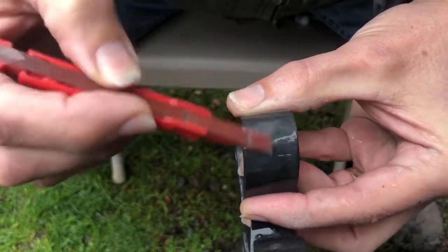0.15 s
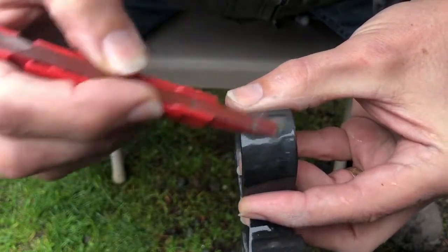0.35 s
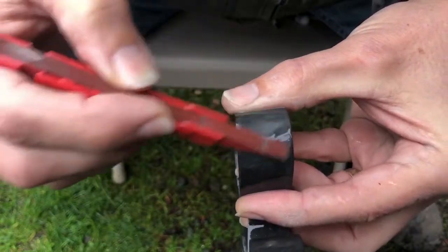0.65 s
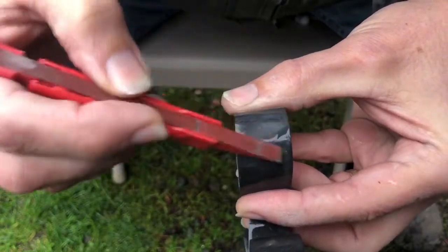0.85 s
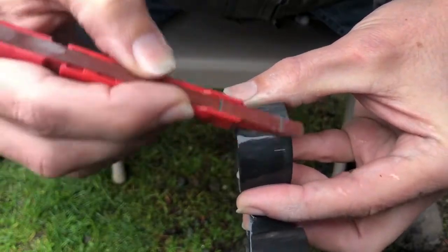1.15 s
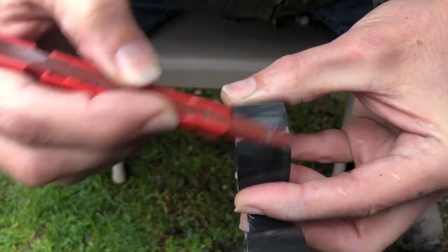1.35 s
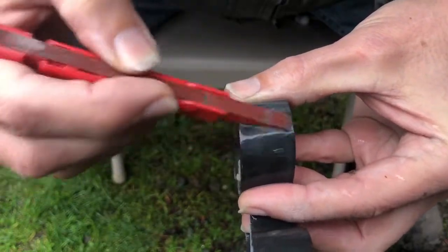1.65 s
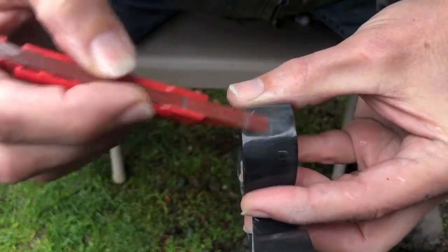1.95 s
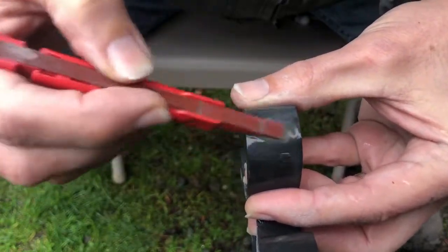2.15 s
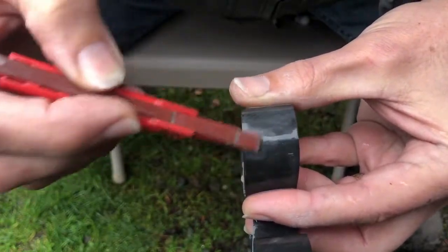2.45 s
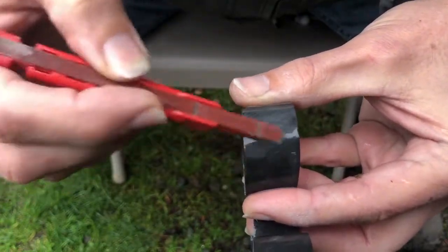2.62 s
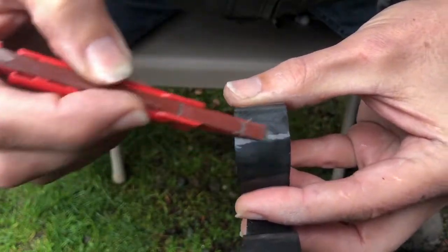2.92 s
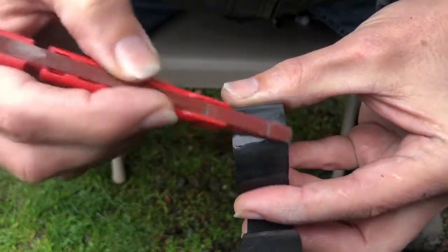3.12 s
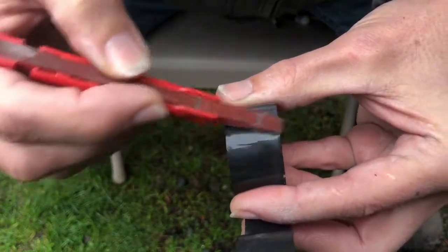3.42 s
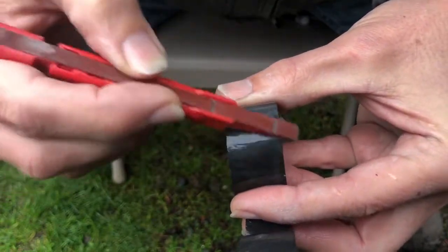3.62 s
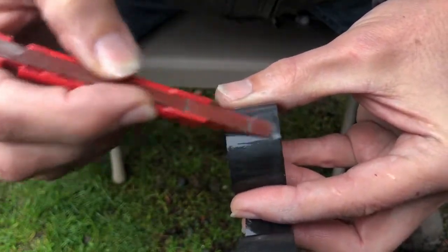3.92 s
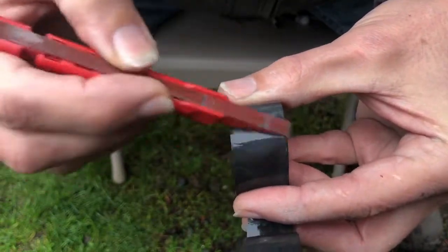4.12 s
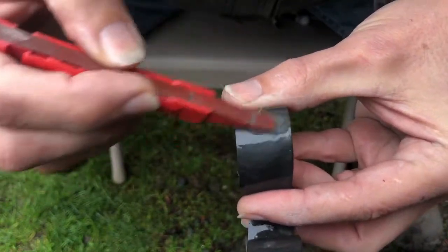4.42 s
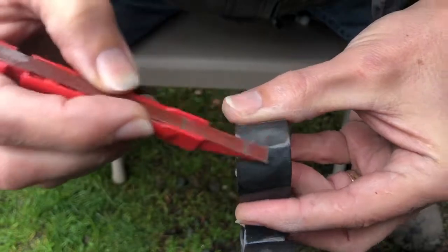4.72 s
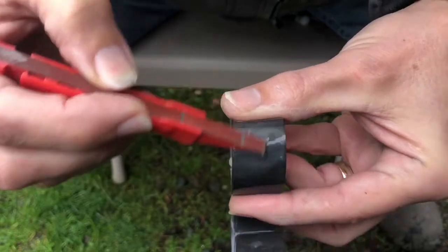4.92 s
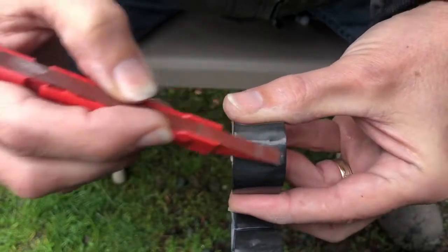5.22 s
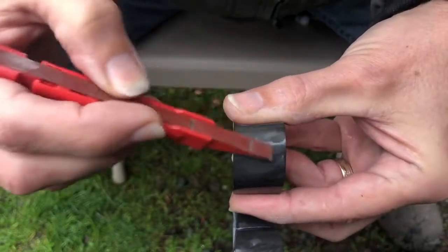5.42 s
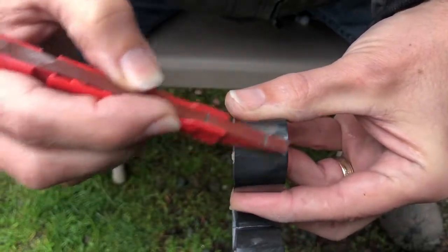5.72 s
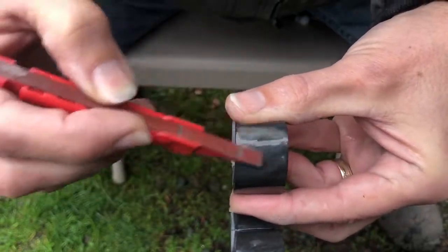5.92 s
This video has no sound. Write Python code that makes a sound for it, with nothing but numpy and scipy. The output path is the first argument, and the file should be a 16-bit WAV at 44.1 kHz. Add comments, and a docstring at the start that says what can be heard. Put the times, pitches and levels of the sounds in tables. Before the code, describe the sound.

Close, rapid back-and-forth wet sanding on hand-held stone, bright rasping strokes dipping at each turn, with low traffic roar far behind outdoors.

```python
"""Wet sanding by a road

A plastic sanding stick scrubs to and fro over a wet stone held in the hand, outdoors.
Dense random grit rings the stone, the stick, its tip and an edge; slurry hisses on top.
Each stroke fades in and out, so the sound sinks at the turns.
Behind it, shaped noise makes a road's rumble and tyre roar; narrow noise and sines make engine tones."""
import sys
import numpy as np
from scipy import signal
from scipy.fft import rfft, irfft, next_fast_len
from scipy.io import wavfile

SR = 44100
rng = np.random.default_rng(int(sys.argv[2]) if len(sys.argv) > 2 else 0)


def materialize(psi):
    """Save the field psi as 16-bit PCM at rate SR to the path in sys.argv[1].

    A 1-D psi becomes a single channel; in a 2-D psi each row is a channel.
    """
    bounded = np.clip(np.atleast_2d(psi).T, -1, 1)
    quanta = np.round(bounded * 32767).astype(np.int16)
    wavfile.write(sys.argv[1], SR, quanta)


N = 267155   # length in samples


def scene():
    """Sanding close by, road far off, in one channel."""
    return (sanding() + road())[None]


# Hand strokes; levels are set before each stroke's swell and lean:
# way, start_s, end_s, stone_db, then stick_db, tip_db, slurry_db (each relative to the stone)
STROKES = [("push", 0.021, 0.17, -57, -2, 4.8, 5), ("pull", 0.16, 0.24, -53, -4.5, -2, 4),
           ("push", .264, .375, -54.5, -2, 4, 1), ("pull", 0.394, 0.457, -48.5, -5, -5, 4),
           ("push", .491, .604, -56, -2, 3, 1), ("pull", .604, .68, -54, -2, 0, 5),
           ("push", 0.72, .83, -55.5, -1.5, 4, 0), ("pull", .82, .909, -52, -4.5, -4, 1),
           ("push", .94, 1.007, -57, -1, 4, 2.1), ("pull", 1.007, 1.15, -54, -4, -3, 2),
           ("push", 1.163, 1.25, -57, -1, 3, 5.4), ("pull", 1.24, 1.358, -54.5, -2.5, -2, 2),
           ("push", 1.399, 1.518, -55, -3, 2.1, 6.4), ("pull", 1.505, 1.594, -52, -4, -3.5, 3.8),
           ("push", 1.625, 1.757, -56.5, -5, 2, 4), ("pull", 1.746, 1.851, -52.5, -4.5, -5, 1),
           ("push", 1.871, 2.011, -58, -1, 3, 6.7), ("pull", 1.997, 2.092, -53.5, -4.5, -3, 2),
           ("push", 2.097, 2.261, -60.5, -4, 3, 4), ("pull", 2.248, 2.327, -55, -5.5, -2, 0),
           ("push", 2.379, 2.422, -55.5, -7, 4, 3.7), ("catch", 2.43, 2.478, -55, -1.9, 2, 1),
           ("pull", 2.493, 2.555, -57, -1.95, 0, 2), ("push", 2.617, 2.7, -57, -2, 1.9, 0.99),
           ("catch", 2.691, 2.723, -53.5, -8, 3, 4), ("pull", 2.72, 2.792, -57.5, -1, -2, 3),
           ("push", 2.872, 2.912, -54.5, -6, 3, 4), ("catch", 2.92, 2.976, -55, -4.5, 3, 2),
           ("pull", 2.983, 3.054, -56, -2, -4, 0), ("push", 3.106, 3.175, -55.5, -2.5, 4, 3),
           ("catch", 3.176, 3.216, -54, -2, 3, 1), ("pull", 3.231, 3.298, -57.5, 0, 0, 5.8),
           ("push", 3.362, 3.483, -56, -1, 1, 2), ("pull", 3.473, 3.563, -56.5, -2, -0.97, 7.4),
           ("push", 3.608, 3.71, -60.5, 1.9, 1, 4), ("pull", 3.686, 3.786, -58.5, -3, 3, 6.2),
           ("push", 3.844, 3.88, -57.5, -1, 6, 7), ("pull", 3.88, 4.047, -58, 0, 1, 2.1),
           ("push", 4.1, 4.223, -58.5, 1, 3, 2.1), ("pull", 4.228, 4.284, -58.5, 0, -2.5, 4.7),
           ("push", 4.337, 4.43, -57, -2, 3.05, 1), ("catch", 4.407, 4.446, -53.5, -9, 5, 1),
           ("pull", 4.459, 4.534, -55, -4, -2, 5), ("push", 4.614, 4.673, -54.5, 0, 0, -4),
           ("pull", 4.647, 4.767, -58, -5, 0, 5), ("push", 4.849, 4.875, -52.5, 0.95, 1, 0),
           ("pull", 4.916, 4.99, -53.5, -6, -0.96, 1), ("push", 5.075, 5.156, -56, -5, 3, 2),
           ("pull", 5.157, 5.239, -55.5, -5.5, 1, 4), ("push", 5.31, 5.38, -58.5, 0, 0, -3),
           ("pull", 5.354, 5.488, -57.5, -9, -2.07, 4.1), ("push", 5.572, 5.597, -49, -2, -4, -4),
           ("pull", 5.641, 5.716, -54, -6, -1.9, 3.9), ("push", 5.797, 5.855, -54.5, -3, 0, 1),
           ("pull", 5.852, 5.94, -55.5, -6, 0, 5), ("push", 6.028, 6.059, -53.5, -1.05, 2, 1)]
# What each way of moving shares; a catch is a short rub where the stick turns at the far end:
# edge_db (relative to the stone), rise from start to end: stick_rise_db, tip_rise_db, slurry_rise_db,
# then reach along the stick (0-1): start_reach, end_reach
WAYS = {"push": (-7.5, 6, -3, -2.5, .0, 0.96), "catch": (-3, -8, 0, 4, .8, .7),
        "pull": (-9.5, 6, 0.5, -1.5, 0.8, .1)}
# The paste thickens and the hand moves round the stone:
# time_s, slurry_pitch_hz (at no reach), edge_db (added to the way's own), pull_stick_rise_db (added on pulls)
PROGRESS = [(0, 14000, 1.5, -1), (2.0, 14300, 2, -5), (3.0, 14000, -2, -5), (3.7, 14100, 1, 2),
            (4.6, 13500, -2, 6), (5.3, 13500, -0.5, 10), (6.06, 13500, -1, 5)]


def sanding():
    """One stream of grit, in clumps, drives all the ringing parts under the strokes."""
    start, end, stone_db, stick_db, tip_db, slurry_db = np.transpose([row[1:] for row in STROKES])
    ways = [WAYS[row[0]] for row in STROKES]
    edge_db, stick_rise, tip_rise, slurry_rise, start_reach, end_reach = np.transpose(ways)
    slurry_hz, edge_extra_db, pull_rise = in_time(PROGRESS)

    is_pull = [row[0] == "pull" for row in STROKES]
    stick_rise = stick_rise + pull_rise[(start * SR).astype(int)] * is_pull

    # strokes may overlap, so never let the reach curve step back in time
    times = np.maximum.accumulate(np.ravel([start, end], "F"))
    reach, = in_time(np.transpose([times, np.ravel([start_reach, end_reach], "F")]))

    clumps = from_db(0.84 * drift(54))
    grains = grit(per_s=20000, spread_db=3.0) * clumps
    out = ring_stone(grains, stone_db, stick_rise)
    out += ring_stick(grains, stone_db + stick_db, stick_rise)
    out += ring_tip(grains, stone_db + tip_db, tip_rise, reach)
    out += ring_edge(grains, stone_db + edge_db, stick_rise, edge_extra_db)
    out += hiss_slurry(grains, stone_db + slurry_db, slurry_rise, reach, slurry_hz)
    return out


def grit(per_s, spread_db):
    """Grains catch at random, some harder than others."""
    sizes = from_db(spread_db * np.minimum(rng.exponential(1, N), 5))
    return sizes * (rng.random(N) < per_s / SR)


# Stone: pitch_hz, width_hz (before the widening in body), level_db (relative within the stone)
STONE_MODES = [(5020, 430, -0.5), (5735, 580, 0), (6330, 540, 0), (6860, 500, 1)]


def ring_stone(grains, level_db, stick_rise):
    """Grit rings the stone, which leans only slightly with the stick."""
    ringing = body(grains, STONE_MODES, flutter_db=1.9)
    return ringing * pressure(level_db, 0.079 * stick_rise, lag_s=0.0052, edge_s=0.023, arch_db=1.0)


# Stick: pitch_hz, width_hz (before the widening in body), level_db (relative within the stick)
STICK_MODES = [(4013, 417, 5), (4435, 480, 1), (2950, 1150, -9)]


def ring_stick(grains, level_db, stick_rise):
    """Grit rings the stick, which swells strongly in mid-stroke."""
    ringing = body(grains, STICK_MODES, flutter_db=1.5)
    return ringing * pressure(level_db, stick_rise, lag_s=0.0051, edge_s=0.024, arch_db=5.0)


# Steady mode of the tip: pitch_hz, width_hz (before the widening in body),
# level_db (relative to the moving mode)
TIP_MODES = [(9070, 800, -6)]


def ring_tip(grains, level_db, tip_rise, reach):
    """The tip has a steady mode and one that rings higher as the contact reaches further."""
    moving_mode = (7940 + 496 * reach, 780, 0)   # pitch in Hz, width in Hz before widening, dB
    ringing = body(grains, [moving_mode] + TIP_MODES, flutter_db=2.0)
    return ringing * pressure(level_db, tip_rise, lag_s=0.003, edge_s=0.023, arch_db=-0.5)


# Edge: pitch_hz, width_hz (before the widening in body), level_db (relative within the edge)
EDGE_MODES = [(10230, 630, 0.14), (11340, 1800, -1.1)]


def ring_edge(grains, level_db, stick_rise, extra_db):
    """The edge swells in mid-stroke like the stick, but leans more weakly and toward the opposite end."""
    ringing = body(grains, EDGE_MODES, flutter_db=1.5) * from_db(extra_db)
    return ringing * pressure(level_db, -0.4 * stick_rise, lag_s=0.002, edge_s=0.023, arch_db=2.0)


# Steady modes of the slurry: pitch_hz, width_hz (before the widening in body),
# level_db (relative to the moving mode)
SLURRY_MODES = [(12700, 750, -5), (13500, 500, -6), (14700, 500, -5), (15300, 1200, -5)]


def hiss_slurry(grains, level_db, slurry_rise, reach, slurry_hz):
    """Grit drives wide, high slurry modes that hiss; one sinks in pitch with reach."""
    moving_mode = (slurry_hz - 300 * reach, 1660, 0)   # pitch in Hz, width in Hz before widening, dB
    hiss = body(grains, [moving_mode] + SLURRY_MODES, flutter_db=2.5)
    return hiss * pressure(level_db, slurry_rise, lag_s=0.00065, edge_s=0.023, arch_db=3.5)


def body(grains, modes, flutter_db):
    """A grain pushes each steep-sided mode one way or the other; modes come and go as contact flutters."""
    rung = 0
    for hz, width_hz, db in modes:
        pushes = grains * rng.choice([-1, 1], N)
        flutter = flutter_db * (drift(16.4) + 0.68 * drift(5.7))
        # four smoothing passes narrow a mode, so each pass is made wider
        rung = rung + from_db(db + flutter) * resonate(pushes, hz, 2.43 * width_hz, order=4)
    return rms_one(rung)


def pressure(level_db, lean_db, lag_s, edge_s, arch_db):
    """Strokes fade in and out, change level where the hand is fastest and lean to one end; powers add."""
    coarse = np.arange(0, N, 32)   # every 32nd sample is enough for a slow curve
    t = coarse / SR - lag_s
    power = 0
    for (_, start, end, *_), db, lean in zip(STROKES, level_db, lean_db):
        along = np.clip((t - start) / (end - start), 0, 1)
        fade = (1 + np.tanh((t - start) / edge_s)) * (1 + np.tanh((end - t) / edge_s)) / 4
        arch = arch_db * (np.sin(np.pi * along) - 0.5)
        power = power + (fade * from_db(db + arch + lean * (along - 0.5))) ** 2
    return np.interp(np.arange(N), coarse, np.sqrt(power))


def road():
    """The road's tyres, rumble and engines add up."""
    return tyres_and_rumble() + steady_engines() + deep_engine() + motor_hum() + passing_engine()


# Road levels, fuller while a car draws away: time_s, roar_db, engine_wash_db, rumble_db
ROAD_LEVELS = [(0, -51, -62, -49.5), (1.0, -49.8, -61, -49), (1.3, -52, -64.5, -51.5), (2.5, -52, -69, -51),
               (4.0, -51.8, -66, -51.5), (6.06, -52, -64, -51.5)]
# Shape of the rumble: pitch_hz, level_db (per Hz, relative)
RUMBLE_SHAPE = [(16, -44), (28, -18), (65, -1), (139, -4.5), (166, -2), (198, -7.5), (331, -13),
                (374, -18.5), (400, -16), (520, -33.5), (880, -120)]
# Shape of the tyre roar: pitch_hz, level_db (per Hz, relative)
ROAR_SHAPE = [(250, -14.5), (400, -17.5), (600, -7.5), (950, -0.5), (1450, -5), (2200, -12.5), (3400, -21),
              (6000, -30), (10000, -38.5), (14000, -41)]
# Engine wash under the roar: pitch_hz, width_hz (of each of two smoothing passes)
WASH_BAND = (510, 400)


def tyres_and_rumble():
    """Shaped noise makes the rumble and roar; noise through one broad resonance makes the engine wash."""
    roar_db, wash_db, rumble_db = in_time(ROAD_LEVELS)
    out = from_db(rumble_db) * coloured(RUMBLE_SHAPE, patchy_db=1.23)
    out += from_db(roar_db) * coloured(ROAR_SHAPE, patchy_db=0.5)
    wash = resonate(rng.standard_normal(N), *WASH_BAND, order=2)
    return out + from_db(wash_db) * rms_one(wash)


# Steady engine tones: pitch_hz, width_hz, level_db
ENGINE_TONES = [(227, 8.8, -65), (413.4, 9.8, -73.5), (674, 14, -72.5)]


def steady_engines():
    """Noise through narrow resonances makes tones that waver."""
    out = np.zeros(N)
    for hz, width_hz, db in ENGINE_TONES:
        out += from_db(db) * rms_one(resonate(rng.standard_normal(N), hz, width_hz))
    return out


# Deep engine tone, before its waver: time_s, pitch_hz, level_db
DEEP_TONE = [(0, 74, -64), (.27, 79.8, -52), (.4, 74, -61), (.6, 71.9, -52), (1.1, 68.9, -53.5),
             (1.5, 71, -66), (1.75, 72, -52.5), (1.92, 72.1, -52), (2.06, 72.2, -60), (2.2, 72.9, -51.5),
             (2.53, 73, -51), (2.65, 73, -62), (2.85, 73, -49), (3.1, 71.8, -59), (3.22, 71.8, -51.5),
             (3.5, 74, -60.5), (4.25, 72, -59), (4.55, 71, -51.5), (4.9, 72, -64), (6.06, 72, -59.5)]


def deep_engine():
    """A low sine swells and sinks while its pitch and level waver."""
    hz, db = in_time(DEEP_TONE)
    waver_hz, waver_db = 4.005, 2.5
    return tone(hz + waver_hz * drift(7.9), db + waver_db * drift(10.0))


# Steady motor, one row: pitch_hz, waver_hz, level_db, waver_db
HUM_TONE = (169, 1.53, -56.5, 1.7)


def motor_hum():
    """A sine wavers a little around a fixed pitch and level."""
    hz, waver_hz, db, waver_db = HUM_TONE
    return tone(hz + waver_hz * drift(5.26), db + waver_db * drift(7.4))


# Passing engine: time_s, pitch_hz, level_db
PASSING_TONE = [(1.22, 116.3, -63), (1.3, 116.6, -50), (1.52, 116, -48), (1.66, 115.5, -64),
                (1.8, 115.3, -52), (1.95, 115.2, -51), (2.08, 115, -63)]


def passing_engine():
    """A sine follows the passing engine and fades steadily outside the listed times."""
    hz, db = in_time(PASSING_TONE)
    t = np.arange(N) / SR
    away_s = np.maximum(PASSING_TONE[0][0] - t, 0) + np.maximum(t - PASSING_TONE[-1][0], 0)
    return tone(hz, db - 28 * away_s)   # fades 28 dB per second


def tone(hz, db):
    """A sine of moving pitch and rms level."""
    return np.sqrt(2) * from_db(db) * np.sin(2 * np.pi * np.cumsum(hz) / SR)


def coloured(spectrum, patchy_db):
    """Noise shaped to a spectrum, its level wandering a little."""
    size = next_fast_len(N)
    hz = np.maximum(np.arange(size // 2 + 1) * SR / size, 1)
    point_hz, point_db = np.transpose(spectrum)
    # straight lines in dB over log pitch
    gain_db = np.interp(np.log(hz), np.log(point_hz), point_db, left=-90, right=point_db[-1])
    noise = irfft(rfft(rng.standard_normal(size)) * from_db(gain_db), size)[:N]
    return rms_one(noise) * from_db(patchy_db * drift(2.2))


def resonate(x, hz, width_hz, order=1):
    """A resonance, fixed or moving: shift its pitch down to zero, smooth, shift back."""
    r = np.exp(-np.pi * width_hz / SR)
    turn = np.exp(2j * np.pi * np.cumsum(hz * np.ones(N)) / SR)
    slow = x * np.conj(turn)
    for _ in range(order):
        slow = signal.lfilter([1 - r], [1, -r], slow)
    return (slow * turn).real


def drift(rate_hz):
    """Slow random wander of spread 1: twice-smoothed noise, made at every 40th sample."""
    r = np.exp(-2 * np.pi * rate_hz * 40 / SR)
    noise = rng.standard_normal(N // 40 + 2002)
    slow = signal.lfilter([1], [1, -2 * r, r * r], noise)[2000:]   # drop the filter's start-up
    return np.interp(np.arange(N) / 40, np.arange(len(slow)), rms_one(slow))


def in_time(rows):
    """Columns of a curve at every sample."""
    s, *columns = np.transpose(rows)
    return [np.interp(np.arange(N) / SR, s, c) for c in columns]


def from_db(db):
    """Decibels to gain."""
    return 10 ** (np.asarray(db) / 20)


def rms_one(x):
    """Scale to unit rms."""
    return x / np.sqrt(np.mean(x ** 2) + 1e-20)


def record(dry):
    """The microphone loses the deepest bass; the top is cut steeply."""
    low_cut = signal.butter(3, 36, "high", fs=SR, output="sos")
    top_cut = signal.ellip(16, 0.5, 80, 15750, fs=SR, output="sos")   # 0.5 dB ripple, 80 dB down
    return signal.sosfilt(top_cut, signal.sosfilt(low_cut, dry))


dry = scene()
out = record(dry)
materialize(out)
```